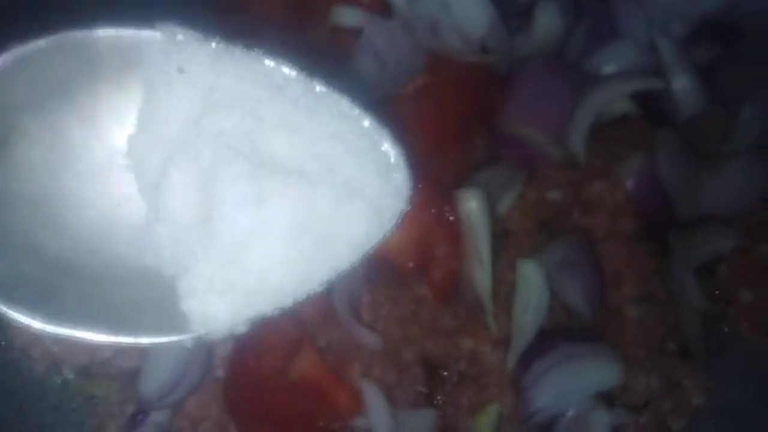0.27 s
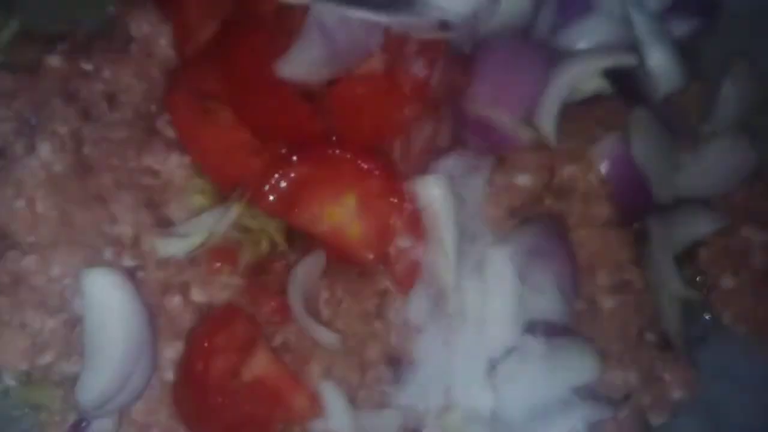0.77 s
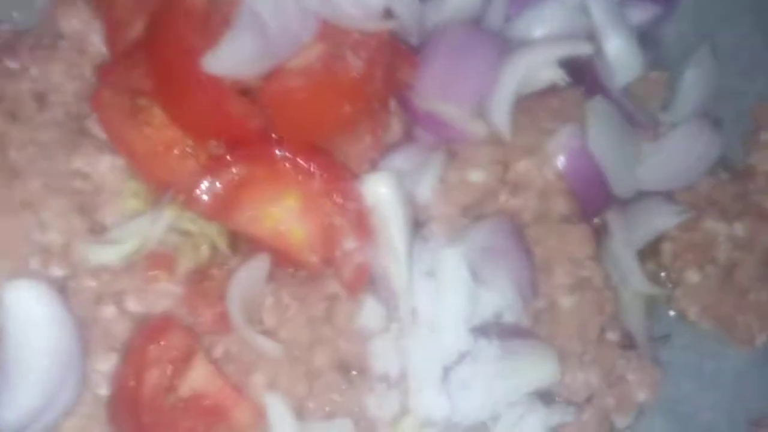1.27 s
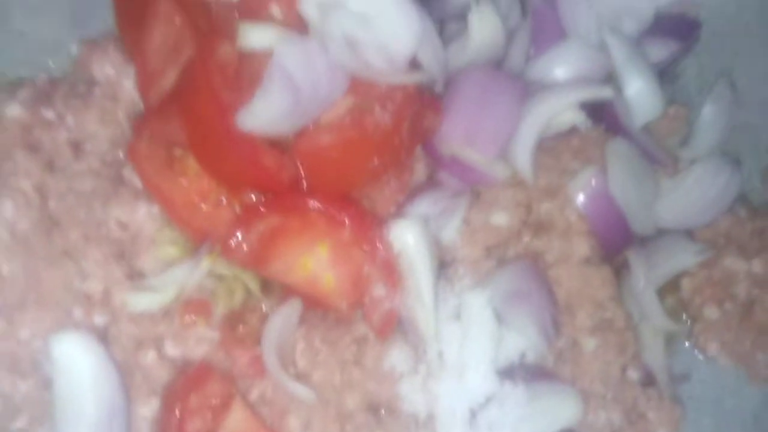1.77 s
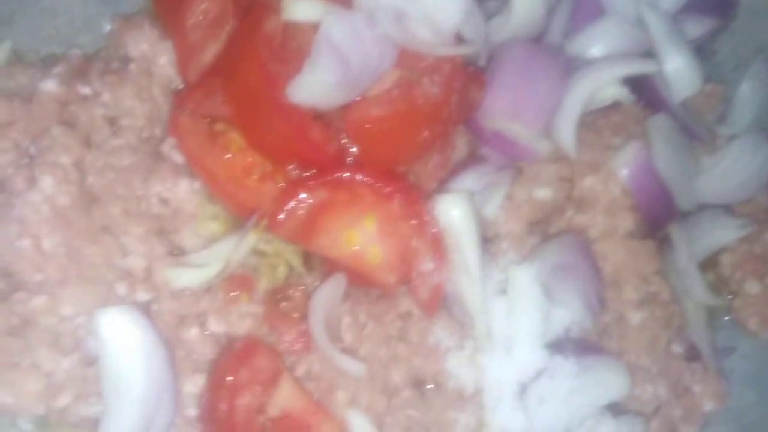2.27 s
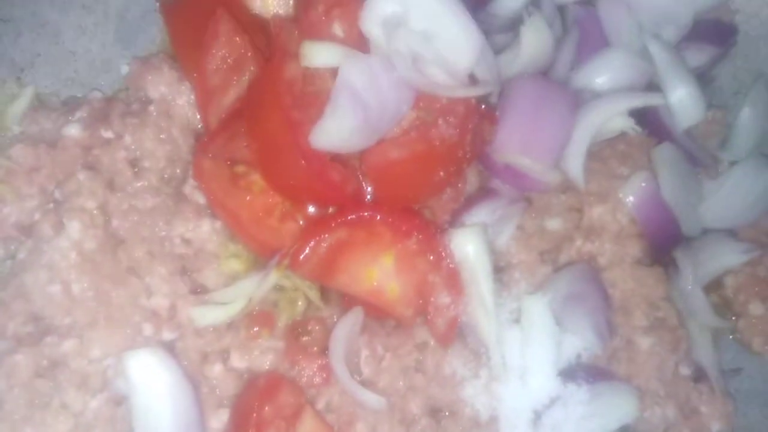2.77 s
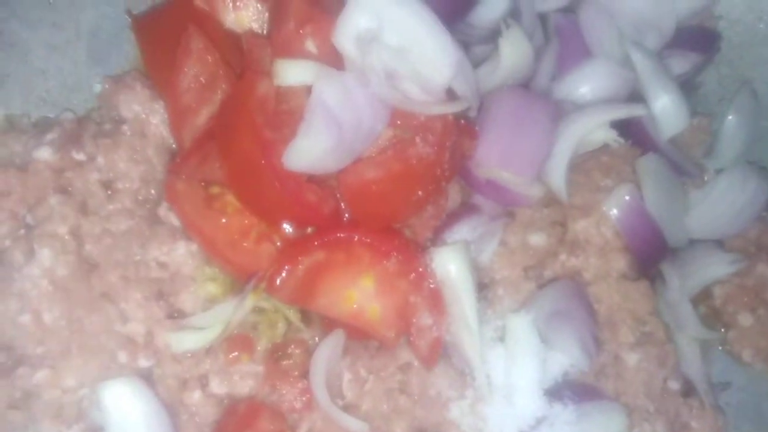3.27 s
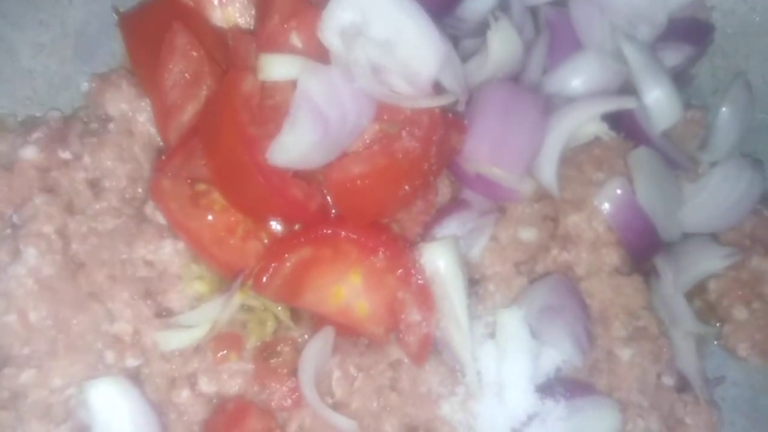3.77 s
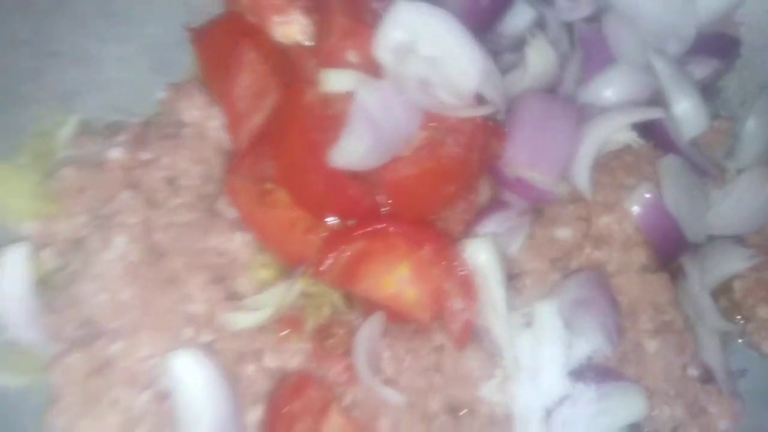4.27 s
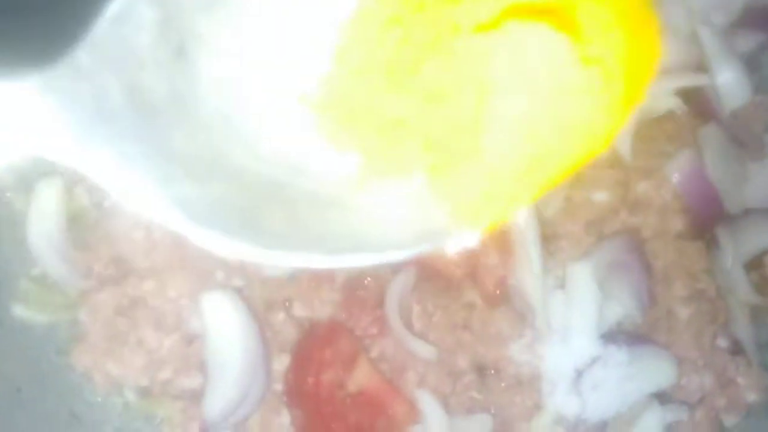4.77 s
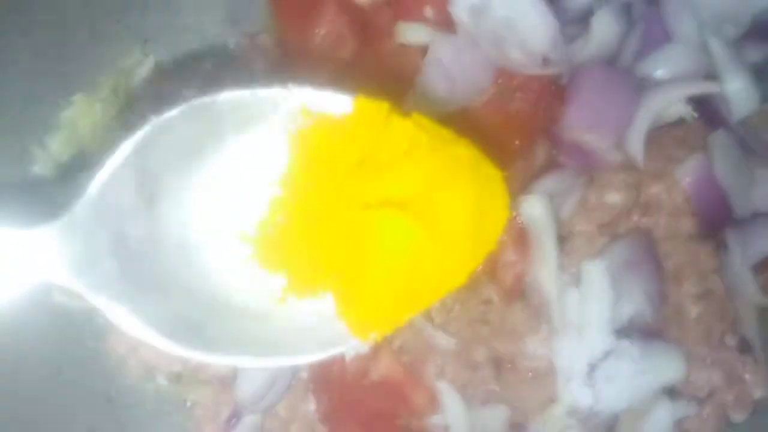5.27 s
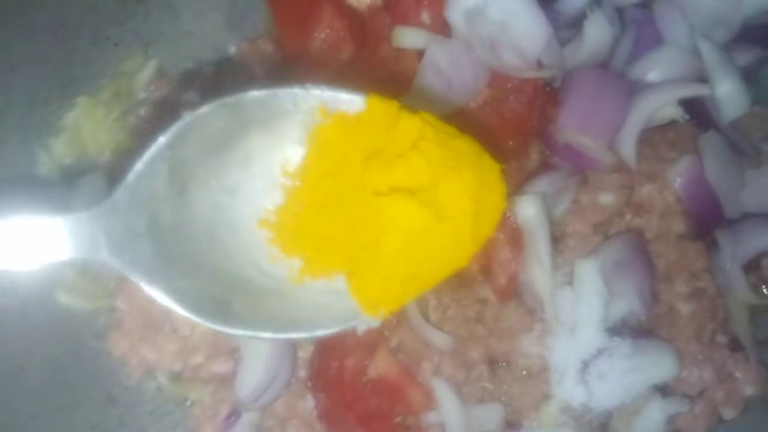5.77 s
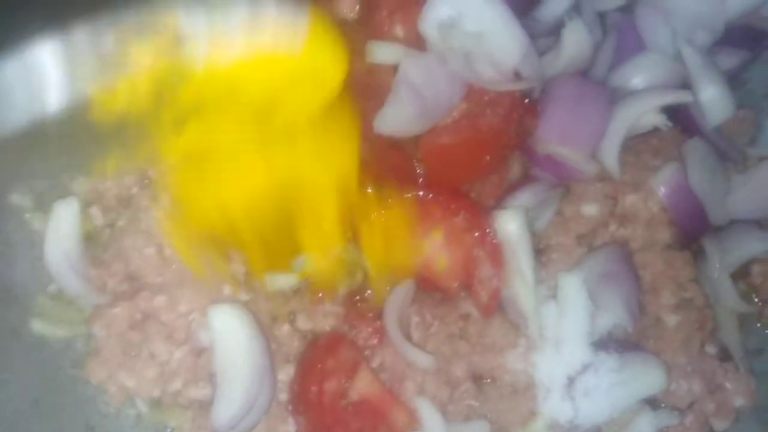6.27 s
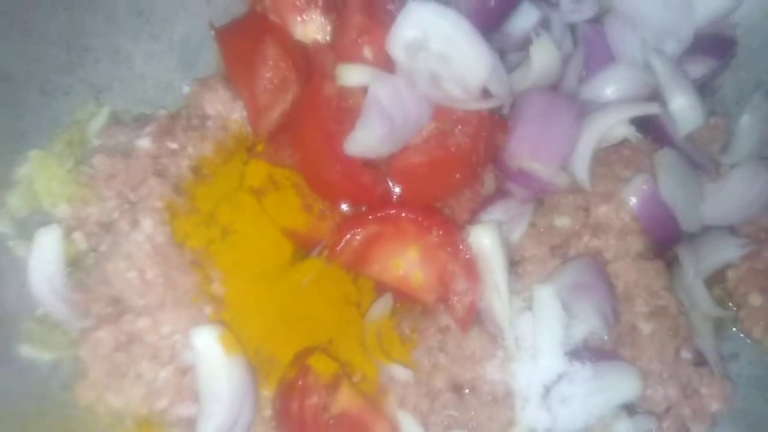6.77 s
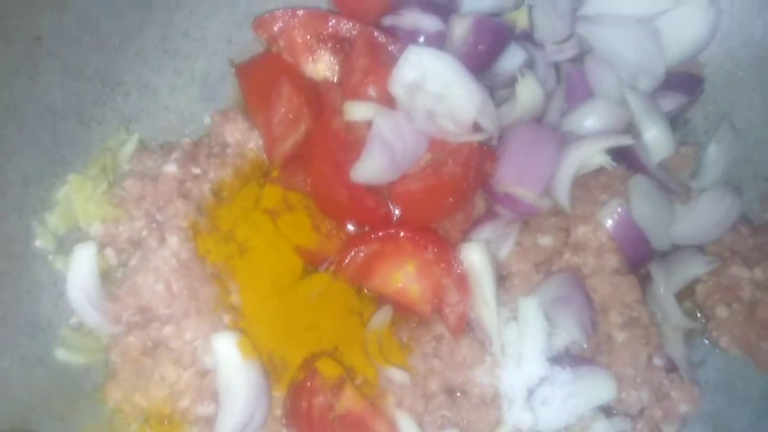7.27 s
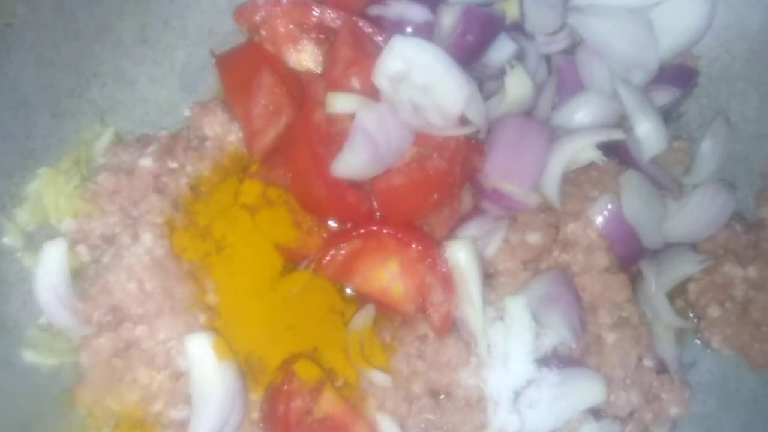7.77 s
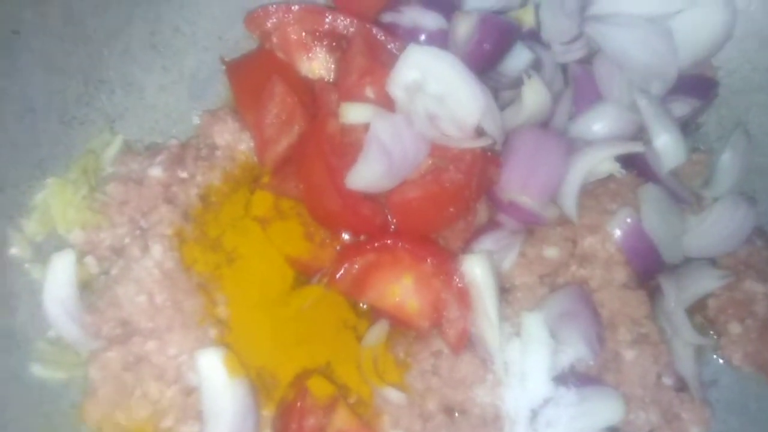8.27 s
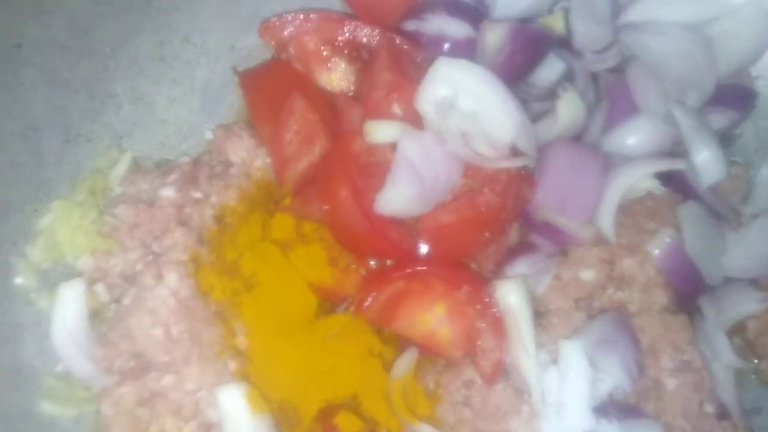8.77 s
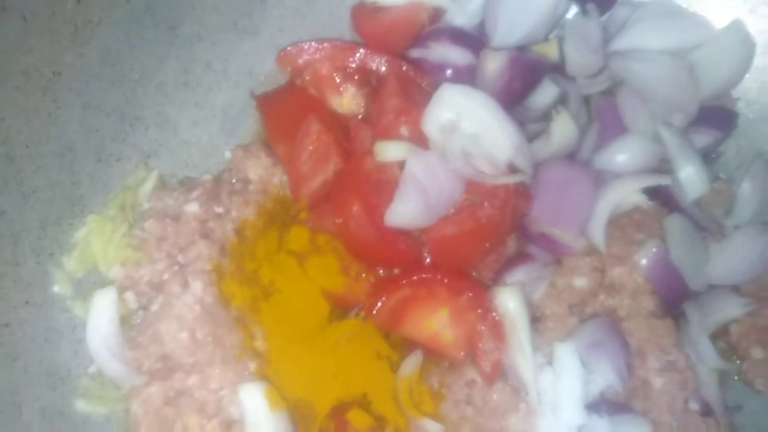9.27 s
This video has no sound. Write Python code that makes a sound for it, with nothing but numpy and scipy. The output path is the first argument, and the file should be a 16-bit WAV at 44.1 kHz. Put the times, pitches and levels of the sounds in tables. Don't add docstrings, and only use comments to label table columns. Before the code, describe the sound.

A very quiet kitchen bed: thin high insect buzz around 3 and 7 kHz, throbbing ten times a second and leaning left, with faint low hum and short murky tonal swells that surface and vanish. At about 0.7 s salt grains land in a soft, crisp patter. Two loud, bright steel knocks on a loaded pot rim hit at 1.5 and 1.7 s, with a thump, rattling crack, short damped ring and small-room echo. From 2.5 to 2.7 s and 3.1 to 3.8 s, a spoon ticks and scrapes grittily in a hollow jar, the sharpest tap near 3.4. Faint distant bird glides come at 2.9, 4.2 and 4.4 s. A soft high swell rises at 5.85. Pot knocks return at 6.6, 6.8, 7.1, 7.5, a loud one at 7.8, and a faint dull one at 8.0. A blunt finger pop and brief rub strike the left microphone at 9.1 s.

```python
import sys
import numpy as np
from scipy import signal
from scipy.fft import rfft, irfft, next_fast_len
from scipy.io import wavfile
from scipy.ndimage import uniform_filter1d

SR = 44100
rng = np.random.default_rng(int(sys.argv[2]) if len(sys.argv) > 2 else 0)


def wav_out(sig):
    wavfile.write(sys.argv[1], SR, np.round(np.clip(np.atleast_2d(sig).T, -1, 1) * 32767).astype(np.int16))


def how_loud(loudness_db):
    steps = np.asarray(loudness_db, float) / 20
    return 10 ** steps


N = 418950

# f/Hz, left level/dB, right level/dB
FLOOR = [(25, -122, -121), (62.5, -102, -101), (101, -94.5, -90.5), (150, -96, -97), (430, -103, -104),
         (654, -108, -108), (1620, -107, -109), (3180, -100, -110), (3800, -105, -116), (5400, -106, -123),
         (6350, -124, -137), (8500, -132, -140), (12000, -126, -124), (14500, -135, -132)]
# f/Hz, width/Hz, left level/dB, right level/dB, throb/dB, buzz/dB, leak/dB
INSECTS = [(7064, 590, -50.5, -68, 4.5, 1, 5.5), (2963, 814, -53.5, -82.5, 0.3, -5, 11),
           (2184, 170, -66.5, -81.5, 0.3, 0.4, 25.5), (10970, 760, -71.5, -87.5, 0.25, 1.4, 6.5),
           (3972, 100, -74, -92.5, -3.1, -0.3, 12), (6070, 37, -73, -95, 5.7, -3.9, 24.5)]
# t/s, lead/throbs
DRIFT = [(0, -0.18), (1.5, 0.037), (3, .01), (4.5, 0.023), (5, -.2), (7, -0.0032), (7.5, -0.23),
         (9.5, -0.077)]
# centre t/s, length/s, f/Hz, level/dB
SWELLS = [(0.145, 0.18, 392, -54.5), (0.625, 0.082, 335, -69), (0.861, 0.075, 1180, -80),
          (0.994, 0.051, 266, -64), (0.979, 0.056, 707, -75), (1.238, 0.24, 265, -55),
          (1.248, 0.083, 1180, -78), (1.983, 0.29, 261, -59), (2.738, 0.34, 265.5, -50),
          (2.668, 0.2, 360, -57.5), (2.982, 0.11, 496, -58.5), (3.034, 0.15, 265, -55.5),
          (3.75, 0.14, 336, -62.5), (4.113, .1, 314, -69), (4.412, 0.19, 320, -71),
          (5.415, 0.1, 420, -73.5), (5.609, 0.16, 1292, -68), (5.634, 0.22, 1750, -81),
          (5.85, 0.19, 3240, -52.5), (6.279, 0.092, 432, -68.5)]
# f/Hz, level/dB
GRAINS = [(1500, -20), (3000, 14.5), (5000, -16), (9000, 1.5), (13000, -5), (15000, -25.5)]
# t/s, peak level/dB, brightness/(dB/octave), pan/dB
KNOCKS = [
    (1.5193, -3, 1.5, 5),
    (1.7013, 2.5, 0.91, 2.8),
    (6.5775, -5, 0.17, 2.1),
    (6.8125, -1.5, -0.08, 1.5),
    (7.0576, -2, 0.75, 2),
    (7.5051, -6, -0.1, 1.2),
    (7.7583, 0.5, 0.54, 3.5),
    (8.0305, -17, -2, 0.7),
]
# f/Hz, level/dB, t60/s; the first three are the thump
POT_MODES = [(90, -26.5, .3), (133.5, -21.5, 0.29), (272.4, -19, .2), (543, -10, 0.18), (930, -10.5, 0.17),
             (1085, -11.5, 0.43), (1128, -8, 0.072), (1358, -5.5, 0.075), (1720, -5.5, 0.25),
             (2130, -5, 0.099), (2331, -18.5, 0.045), (2880, -9.5, .1), (2921, -8, 0.17),
             (3015, -5.5, 0.32), (3330, 7, 0.051), (2960, -14, .12), (3700, -13, 0.038), (4200, 1.5, 0.12),
             (4440, -6.5, 0.1), (4400, -14, 0.04), (5430, -7, 0.061), (5230, -10, 0.15), (5100, -23, 0.027),
             (5730, -19, .08), (7170, -13, 0.19)]
# f/Hz, level/dB
CRACK = [(30, -49), (90, -22), (300, -12.5), (1000, -1), (3000, 3.5), (5000, -1.5), (7000, -12),
         (10000, -25), (14000, -38), (15500, -60.5)]
# t/s, peak level/dB, hollow level/dB
TAPS = [(2.5152, -16.5, -42), (2.5767, -21, -16), (2.5883, -44, -29), (2.6692, -34.5, -8),
        (3.133, -41.5, -30), (3.2109, -37, -30.5), (3.274, -38, -20), (3.294, -25, -43), (3.3145, -23, -49),
        (3.343, -19.5, -24), (3.397, -26, -40), (3.4064, -24, -40), (3.4178, -8.5, -25),
        (3.4952, -30.5, -25), (3.5307, -25, -17.5), (3.5534, -25.5, -24.5), (3.6376, -31, -30),
        (3.6776, -19.5, -20.5), (3.7136, -27.5, -22), (3.7235, -29, -28)]
# f/Hz, level/dB, t60/s
SPOON_MODES = [(879, -25.5, 0.057), (1367, -31.5, 0.06), (1750, -19, 0.063), (2390, -22.5, 0.046),
               (2960, -4.5, 0.032), (3250, -5.5, 0.11), (3303, 5, 0.031), (4490, -14, 0.058),
               (5360, -1.5, 0.05), (5266, -9.5, 0.06), (9480, -21.5, 0.026), (12040, -15.5, 0.017)]
# f/Hz, level/dB, t60/s
JAR_AIR = [(434.5, -6, 0.1), (494.7, -0.5, 0.097)]
# f/Hz, level/dB
TICK = [(300, -59), (1200, -23.5), (2300, -3), (3200, 9.5), (4300, -4.5), (5500, 5), (6300, -11.5),
        (12000, -40), (15000, -52)]
# centre t/s, length/s, pressure level/dB, depth in jar level/dB
STROKES = [
    (2.583, 0.069, -49.5, -13.5),
    (2.728, 0.052, -62, 6.5),
    (3.238, 0.062, -54, -9.5),
    (3.345, 0.048, -46, -24),
    (3.466, 0.035, -54, -28),
    (3.567, 0.035, -44.5, -32),
    (3.663, 0.023, -48.5, -9),
    (3.73, 0.08, -52, -19),
]
# t/s, length/s, from f/Hz, to f/Hz, level/dB
CHIRPS = [
    (2.906, .06, 2804, 4400, -48.5),
    (4.196, .064, 6640, 2502, -49),
    (4.362, 0.065, 2750, 5400, -52.5),
]
# f/Hz, t60/s
ROOM_T60 = [(100, 0.71), (260, 0.5), (700, 0.39), (1840, 0.37), (4850, 0.33), (8000, 0.29), (12800, 0.29)]
# f/Hz, level/dB
RIGHT_PORT = [(60, 3.5), (700, 3), (1300, 4.5), (2400, -7), (4400, -8.5), (6500, -14.5), (9000, -18),
              (15000, -9)]

MAINS_HZ, MAINS_DB = 100, -69.5
FRIDGE_HZ, FRIDGE_DB = 133, -75.5
STEADY_BELOW_HZ, STEADY_MARGIN = 1500, .5
THROBS_PER_S = 10.12
SWELL_CYCLES = 26
BOTH_OPEN_DB, LEAN_PER_DB, LEAN_PER_OCTAVE_DB = -52.5, 0.94, 3
SALT_S, SALT_ATTACK_S, SALT_HOLD_S = .66, .014, .05
SALT_DB, SALT_FADE_DB_PER_S = -56, 140
CLUMP_S, CLUMP_LENGTH_S, CLUMP_DB, CLUMP_HZ = .71, .015, -52, [3000, 5600]
THUMP_DB = 0
WALL_S, WALL_DB = .023, -12.5
SKID_T60_S = .012
STROKE_EDGE_DB, RUSTLE_DB = 8.5, 4.5
BUMP_S, BUMP_DB, BUMP_HZ, BUMP_T60_S = 9.0906, -8, 850, 0.006
CASE_HZ, CASE_DB, CASE_T60_S = 270, -23, .025
RUB_DB, RUB_S, RUB_T60_S, RUB_TOP_HZ = -44, .14, .8, 1300
LIKE_BELOW_HZ = 380
PORT_LAG_S = .0008
GATE_MARGIN_DB, GATE_DEPTH_DB = [-0.5, 20.5], 8


def at_hz(points, hz, column=1):
    points = np.array(points)
    return np.interp(np.log(np.maximum(hz, 1)), np.log(points[:, 0]), points[:, column])


def rms_one(x):
    return x / np.sqrt(np.mean(x ** 2) + 1e-20)


def butter(x, order, hz, kind="low"):
    return signal.sosfilt(signal.butter(order, hz, kind, fs=SR, output="sos"), x)


def colour(x, spectrum):
    size = next_fast_len(x.shape[-1])
    gain = how_loud(at_hz(spectrum, np.fft.rfftfreq(size, 1 / SR)))
    return irfft(rfft(x, size) * gain, size)[..., :x.shape[-1]]


def ring(force, hz, t60):
    r, w = how_loud(-60 / (t60 * SR)), 2 * np.pi * hz / SR
    return signal.lfilter([0, np.sin(w)], [1, -2 * r * np.cos(w), r * r], force + 1e-18)


def strike(times, level_db, modes, spread_db, tilt_db=0, skid_t60=None):
    at = np.round(np.array(times) * SR).astype(int)
    luck = rng.standard_normal((len(at), len(modes), 2))
    out = np.zeros(N)
    for k, (hz, mode_db, t60) in enumerate(modes):
        blow_db = level_db + mode_db + tilt_db * np.log2(hz / 2000) + spread_db * luck[:, k, 0]
        force = np.zeros(N)
        force[at] = how_loud(blow_db) * np.sign(luck[:, k, 1])
        rung = ring(force, hz, t60)
        if skid_t60:
            rung = 2 * (1 - how_loud(-60 / (skid_t60 * SR))) * ring(rung, hz, skid_t60)
        out += rung
    return out


def cracks(times, level_db, t60, spectrum):
    force = np.zeros(N)
    force[np.round(np.array(times) * SR).astype(int)] = how_loud(level_db)
    burst = signal.lfilter([1], [1, -how_loud(-60 / (t60 * SR))], force + 1e-18)
    gated = burst * rms_one(colour(rng.standard_normal(N), spectrum))
    return colour(gated, [(hz, db / 2) for hz, db in spectrum])


def alike_in_bass(pair):
    return np.array([pair[0], pair[1] + butter(pair[0] - pair[1], 2, LIKE_BELOW_HZ)])


def kitchen(x, level_db):
    t = np.arange(SR // 2) / SR
    edges_hz = 60 * 2 ** np.arange(0, 8.1, .5)
    white, echo = alike_in_bass(rng.standard_normal((2, len(t)))), 0
    for low, high in zip(edges_hz, edges_hz[1:]):
        band = butter(white, 2, [low, high], "band")
        echo = echo + band * how_loud(-60 * t / at_hz(ROOM_T60, np.sqrt(low * high)))
    echo = echo * np.clip((t - .002) / 0.0061, 0, 1)
    echo = echo / np.sqrt(np.sum(echo[0] ** 2))
    return how_loud(level_db) * signal.fftconvolve(x[None], echo)[:, :N]


def flicker(shape, bins, frames):
    field = rng.standard_normal((shape[0], shape[1] // bins + 1, shape[2]))
    field = uniform_filter1d(uniform_filter1d(field, frames, axis=2), frames // 2, axis=2)
    return rms_one(np.repeat(field, bins, axis=1)[:, :shape[1]])


def white_cells():
    return signal.stft(alike_in_bass(rng.standard_normal((2, N))), SR, nperseg=512)


def suppressed(white, gain, patchy_db, leak_db, threshold):
    hz, _, cells = white
    chance = flicker(cells.shape, bins=2, frames=21)
    margin = STEADY_MARGIN * (hz < STEADY_BELOW_HZ)[:, None]
    opened = 1 / (1 + np.exp(-6 * (chance - margin - np.array(threshold)[:, None, None])))
    opened = opened * (hz > 200)[:, None]
    cells = cells * gain(hz)[..., None] * how_loud(patchy_db * chance + leak_db * opened)
    return signal.istft(cells, SR, nperseg=512)[1][:, :N]


def floor():
    t = np.arange(N) / SR
    residue = suppressed(white_cells(), np.ones_like, 1.0, 19.5, [1.15, 2.8])
    shaped = [colour(x, [(row[0], row[1 + k]) for row in FLOOR]) for k, x in enumerate(residue)]
    hum = how_loud(MAINS_DB) * np.sin(2 * np.pi * MAINS_HZ * t)
    hum = hum + how_loud(FRIDGE_DB) * np.sin(2 * np.pi * FRIDGE_HZ * t)
    return np.sqrt(SR / 2) * np.array(shaped) + hum


def insects():
    t = np.arange(N) / SR
    count = THROBS_PER_S * t + np.interp(t, *np.transpose(DRIFT))
    throb = np.cos(2 * np.pi * count)
    buzz = np.cos(12 * np.pi * count) + np.cos(24 * np.pi * count)
    out, white = 0, white_cells()
    for hz, width_hz, left_db, right_db, throb_db, buzz_db, leak_db in INSECTS:
        def gain(f):
            return np.exp(-np.abs((f - hz) / width_hz * 1.7) ** 4.8)
        band = suppressed(white, gain, 0.47, leak_db, [-.3, 2.2])
        band = np.array([rms_one(x) for x in band])
        out = out + band * how_loud(throb_db * throb + buzz_db * buzz) * how_loud([[left_db], [right_db]])
    return out


def swells():
    out = np.zeros((2, N))
    for s, length, hz, level_db in SWELLS:
        pan_db = LEAN_PER_DB * (BOTH_OPEN_DB - level_db) + LEAN_PER_OCTAVE_DB * np.log2(hz / 250)
        at = np.arange(max(s - length, 0) * SR, (s + length) * SR).astype(int)
        t60 = min(.043, SWELL_CYCLES / hz * 2)
        tone = ring(ring(rng.standard_normal(SR), hz, t60), hz, t60)
        tone = rms_one(tone[SR - len(at):])
        hump = np.exp(-(2.05 * (at / SR - s) / length) ** 4)
        out[:, at] += how_loud(level_db) * tone * hump * how_loud([[pan_db / 2], [-pan_db / 2]])
    return out


def salt():
    t = np.arange(N) / SR
    since = t - SALT_S
    fade_db = SALT_FADE_DB_PER_S * np.maximum(since - SALT_HOLD_S, 0)
    pour = np.clip(since / SALT_ATTACK_S, 0, 1) ** 2 * how_loud(SALT_DB - fade_db)
    grains = rng.standard_normal((2, N)) * (rng.random((2, N)) < 9000 / SR)
    clump = rms_one(butter(grains, 2, CLUMP_HZ, "band"))
    clump = clump * how_loud(CLUMP_DB) * np.exp(-((t - CLUMP_S) / CLUMP_LENGTH_S) ** 2)
    return (rms_one(colour(grains, GRAINS)) * pour + clump) * how_loud([[8], [3]])


def pot():
    s, peak_db, tilt_db, pan_db = np.transpose(KNOCKS)
    modes = strike(s, peak_db - 23, POT_MODES[3:], 3.3, tilt_db)
    modes = modes + strike(s, peak_db - 19.0 + THUMP_DB, POT_MODES[:3], 1.2)

    band_db = np.array([THUMP_DB + 0 * s, -.8 * tilt_db, .7 * tilt_db, 5.0 * tilt_db])
    blow = np.zeros((4, N))
    blow[:, np.round(s * SR).astype(int)] = how_loud(peak_db + 18.0 + band_db)
    low = butter(blow[0], 2, 450)
    middle = butter(blow[1], 2, [450, 1800], "band")
    upper = butter(blow[2], 2, [1800, 4200], "band")
    high = butter(blow[3], 2, 4200, "high")
    echo = kitchen(modes + colour(middle - low - upper + high, CRACK), 1.7)

    body = cracks(s, peak_db - 1.5, .026, CRACK)
    edge = cracks(s, peak_db - 1.5 + 3 * tilt_db, .026, CRACK)
    crack = butter(body - edge, 2, 3500) + edge
    wall = how_loud(WALL_DB) * np.roll(crack, round(WALL_S * SR))
    side_db = np.interp(np.arange(N) / SR, s, pan_db)
    return (modes + crack + echo + wall) * how_loud([side_db / 2, -side_db / 2])


def spoon():
    s, peak_db, hollow_db = np.transpose(TAPS)
    rung = strike(s, 0.75 * peak_db - 14, SPOON_MODES, 1.2, skid_t60=SKID_T60_S)
    note = strike(s, peak_db + hollow_db + 5.5, JAR_AIR, 1.8, skid_t60=2 * SKID_T60_S)
    dry = rung + note + cracks(s, 2.04 * peak_db + 9, 0.011, TICK)

    grit = rng.standard_normal(N) * how_loud(3.0 * np.minimum(rng.exponential(1, N), 3))
    grit = grit * (rng.random(N) < 4000 / SR)
    steel = rms_one(sum(how_loud(db) * ring(grit, hz, 3.3 * t60) for hz, db, t60 in SPOON_MODES))
    hollow = rms_one(sum(how_loud(db) * ring(grit, hz, 0.75 * t60) for hz, db, t60 in JAR_AIR))
    rustle = how_loud(RUSTLE_DB) * rms_one(colour(grit, TICK))
    t = np.arange(N) / SR
    for centre, length, pressure_db, depth_db in STROKES:
        hump = how_loud(pressure_db - STROKE_EDGE_DB * ((t - centre) / length) ** 2)
        dry = dry + hump * (steel + rustle + how_loud(depth_db) * hollow)
    return (dry + kitchen(dry, -7)) * how_loud([[1.5], [-1.5]])


def bird():
    dry = np.zeros(N)
    for s, length, from_hz, to_hz, level_db in CHIRPS:
        u = np.linspace(0, 1, round(length * SR))
        waver = rms_one(uniform_filter1d(rng.standard_normal(len(u)), size=300))
        envelope = how_loud(level_db + 5.7 * waver) * np.sin(np.pi * u) ** 0.64
        cycles = np.cumsum(from_hz * (to_hz / from_hz) ** u) / SR
        dry[round(s * SR):][:len(u)] = envelope * np.sin(2 * np.pi * cycles)
    return (.5 * dry + kitchen(dry, 5.3)) * how_loud([[3], [-1.5]])


def bump():
    force = np.zeros(N)
    force[round(BUMP_S * SR):][:2] = -1, 1
    pop = ring(ring(force, BUMP_HZ, BUMP_T60_S), BUMP_HZ * 0.7, BUMP_T60_S)
    case = ring(-pop, CASE_HZ, CASE_T60_S)
    case = how_loud(CASE_DB) * case / np.abs(case).max()
    pop = how_loud(BUMP_DB) * pop / np.abs(pop).max()
    t = np.arange(N) / SR - BUMP_S
    rub = rms_one(butter(rng.standard_normal(N), 3, [120, RUB_TOP_HZ], "band"))
    rub = rub * (t > 0) * how_loud(RUB_DB - 60 * np.abs(t) / RUB_T60_S)
    rub = rub * np.clip((RUB_S - t) / 0.0076, 0, 1)
    return (pop + case) * how_loud([[-.1], [-45]]) + rub * how_loud([[0], [-15]])


def gate(near, bed):
    cells, noise = (signal.stft(x, SR, nperseg=512)[2] for x in (near, bed))
    margin = how_loud(GATE_MARGIN_DB)[:, None, None] ** 2
    limit = np.mean(np.abs(noise) ** 2, axis=2, keepdims=True) * margin
    power = uniform_filter1d(uniform_filter1d(np.abs(cells) ** 2, size=2, axis=1), size=5, axis=2)
    opened = power ** 2 / (power ** 2 + limit ** 2)
    return signal.istft(cells * how_loud(GATE_DEPTH_DB * (opened - 1)), SR, nperseg=512)[1][:, :N]


def scene():
    bed = floor() + insects()
    left, right = salt() + pot() + spoon() + bird()
    right = np.roll(colour(right, RIGHT_PORT), -round(PORT_LAG_S * SR))
    near = np.array([left, right]) + bump()
    return gate(near, bed) + swells() + bed


def top_cut(x):
    return signal.sosfilt(signal.butter(12, 15380, fs=SR, output="sos"), x)


def record(dry):
    heard = butter(dry, 2, 42, "high")
    mix = butter(np.clip(heard, -1, 1), 8, 14600)
    return top_cut(mix)


dry = scene()
out = record(dry)
wav_out(out)
```